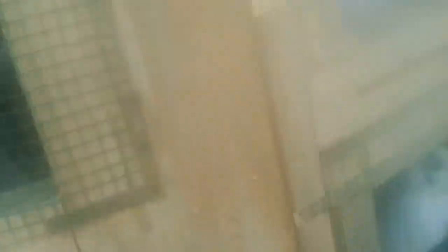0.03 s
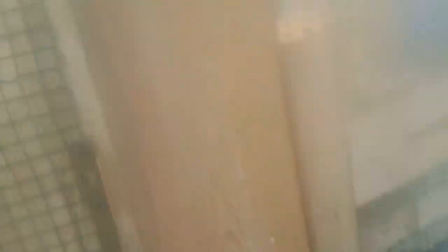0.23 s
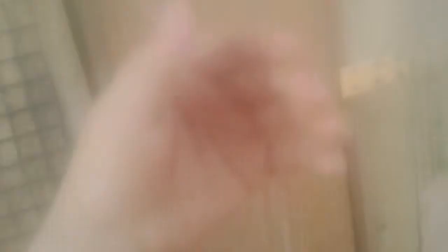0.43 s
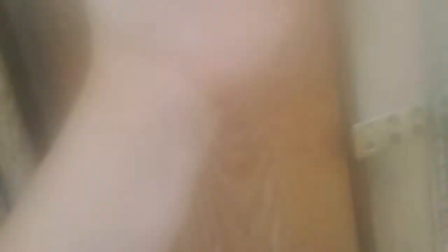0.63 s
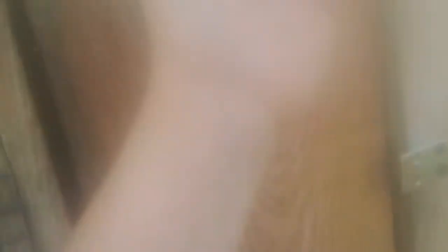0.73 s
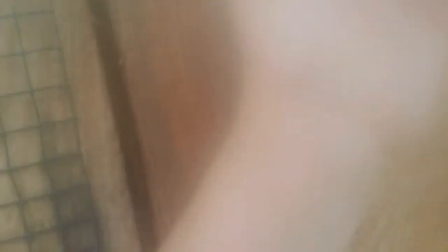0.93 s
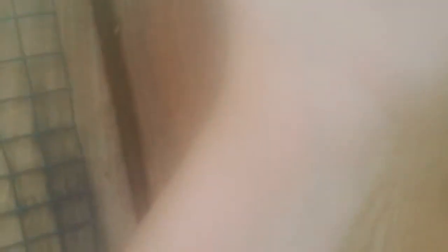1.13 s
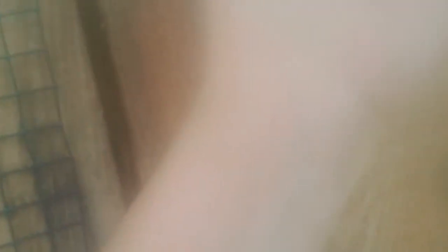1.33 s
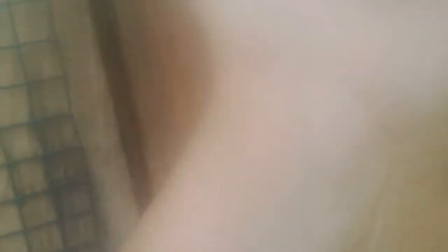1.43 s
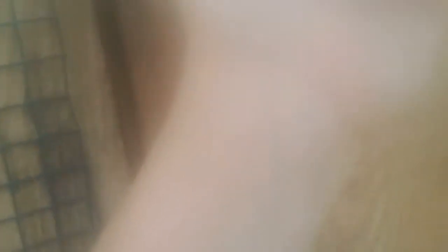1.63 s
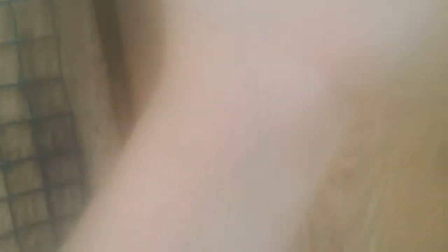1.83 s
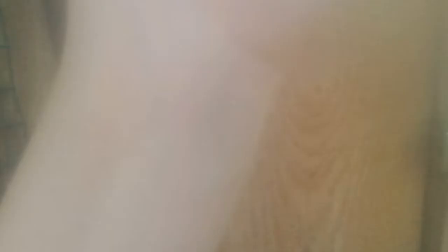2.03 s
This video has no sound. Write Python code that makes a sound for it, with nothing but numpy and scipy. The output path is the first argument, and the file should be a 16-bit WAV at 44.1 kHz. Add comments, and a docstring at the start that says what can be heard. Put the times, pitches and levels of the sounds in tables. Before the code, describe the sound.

Short, sharp clicks and light knocks from a hand working a wire hutch door's latch.

```python
"""The latch and wire door of a wooden hutch tick and knock on the frame as hands fumble with them.
Each knock sets wood and metal ringing, and close walls add a short echo. Skin and wire rub between
the knocks, the bumped hutch shudders once, and sliding metal squeaks twice. The handling rumbles
through the case of a small, close microphone that is most sensitive near 5 kHz."""
import sys
import numpy as np
from scipy import signal
from scipy.fft import rfft, irfft
from scipy.io import wavfile

SR = 44100
rng = np.random.default_rng(int(sys.argv[2]) if len(sys.argv) > 2 else 0)


def output_pcm(signal):
    """Save a mono or channel-first signal as 16-bit PCM at the path in sys.argv[1].

    Samples are clipped to [-1, 1] before scaling.
    """
    pcm = np.clip(np.atleast_2d(signal).T, -1, 1) * 32767
    wavfile.write(sys.argv[1], SR, np.round(pcm).astype(np.int16))


N = 92477   # about 2.1 s


def from_db(db):
    return 10 ** (np.asarray(db) / 20)


def unit_rms(x):
    """Scales a signal to an average power of 1."""
    return x / np.sqrt(np.mean(x ** 2) + 1e-20)


def level_curves(rows):
    """Joins a table's points with straight lines: one curve over time for each level column."""
    times, *columns = np.transpose(rows)
    return [np.interp(np.arange(N) / SR, times, column) for column in columns]


def coloured(x, spectrum):
    """Turns each frequency up or down as the table says; the result has power 1."""
    hz, db = np.transpose(spectrum)
    freqs = np.maximum(np.fft.rfftfreq(N, 1 / SR), 1)
    gain_db = np.interp(np.log(freqs), np.log(hz), db, left=-80, right=-80)
    return unit_rms(irfft(rfft(x) * from_db(gain_db), N))


def band_pass(x, band_hz):
    return signal.sosfilt(signal.butter(2, band_hz, "band", fs=SR, output="sos"), x)


def drift(rate_hz):
    """A smooth random wander, about 1 in size."""
    r = np.exp(-2 * np.pi * rate_hz / SR)
    return unit_rms(signal.lfilter([1], [1, -2 * r, r * r], rng.standard_normal(N + SR))[SR:])


def ring(x, hz, fade_s):
    """Each click in x starts a tone that falls by 60 dB in fade_s (its fade time)."""
    r, w = from_db(-60 / (fade_s * SR)), 2 * np.pi * hz / SR
    return signal.lfilter([0, np.sin(w)], [1, -2 * r * np.cos(w), r * r], x + 1e-18)


def grains(per_s, size, spread_db=1.5):
    """Tiny contacts: random clicks of uneven size and sign."""
    heights = from_db(spread_db * np.minimum(rng.exponential(1, size), 4))
    return heights * rng.choice([-1, 1], size) * (rng.random(size) < per_s / SR)


# Light rubbing that comes and goes (time [s], hiss level [dB], body level [dB])
RUB_LEVELS = [(0, -48, -56.5), (.05, -60, -66), (.1, -61, -64.5), (.18, -56.5, -60.5), (.28, -60.5, -61.5),
              (.33, -69, -69.5), (.42, -69, -70), (.52, -59, -60.5), (.6, -73.5, -70), (.7, -67, -73),
              (.8, -60.5, -60), (.9, -52, -62), (.96, -57, -60.5), (1.04, -54, -58), (1.1, -50, -40.5),
              (1.15, -54, -54.5), (1.2, -56, -60), (1.26, -54.5, -64.5), (1.38, -63.5, -65),
              (1.42, -59.5, -65), (1.49, -61, -64), (1.57, -65.5, -62.5), (1.62, -64, -59.5),
              (1.77, -64, -62), (1.81, -67, -76), (1.84, -54.5, -55.5), (1.9, -47, -38.5),
              (1.97, -52, -52.5), (2.01, -52, -58), (2.1, -46, -40.5)]
# Short, firmer scrapes (start [s], length [s], hiss level [dB], body level [dB])
SCRAPES = [(0, 0.0062, -71, -72), (0.202, 0.058, -58.5, -67), (0.434, 0.059, -44.5, -47.5),
           (0.852, 0.033, -48, -56.5), (1.27, 0.028, -62, -52.5), (1.328, 0.031, -54.5, -72),
           (1.658, 0.072, -47.5, -54.5), (1.861, 0.024, -43.5, -40.5), (2.05, 0.015, -38, -33)]
# Tone colour of the bright hiss and of the duller body (frequency [Hz], level [dB])
HISS_SPECTRUM = [(1470, -17), (2500, -23), (3390, -17.5), (3780, -11), (4780, 8), (5360, 8), (7390, -5.5),
                 (11800, -11.5), (14100, -11), (15500, -29)]
BODY_SPECTRUM = [(59, -27), (100, -12), (485, -9.5), (592, -4), (664, -7.5), (799, -7), (1090, -9),
                 (3000, -8), (3900, -3), (6600, -120)]


def rubbing(attack_s=0.0071, release_s=0.0069, flicker_db=1.5):
    """Skin slides on wire: thousands of tiny clicks blur into a bright hiss and a duller body."""
    hiss, body = map(from_db, level_curves(RUB_LEVELS))
    t = np.arange(N) / SR
    for start, length, hiss_db, body_db in SCRAPES:
        rise = np.clip((t - start) / attack_s, 0, 1)
        fall = np.exp(-np.maximum(t - start - length, 0) / release_s)
        hiss += from_db(hiss_db) * rise * fall
        body += from_db(body_db) * rise * fall
    grit = grains(per_s=9000, size=N)
    flicker = from_db(flicker_db * drift(rate_hz=72))
    return flicker * (hiss * coloured(grit, HISS_SPECTRUM) + body * coloured(grit, BODY_SPECTRUM))


# How loud the handling is (time [s], level [dB])
RUMBLE_LEVELS = [(0, -66), (.06, -76), (.2, -71), (.3, -73), (.42, -82), (.45, -65), (.52, -74),
                 (.7, -81.5), (.8, -61.5), (.84, -49), (.89, -58), (.925, -61), (.955, -64), (1.05, -65),
                 (1.1, -44), (1.2, -65.5), (1.38, -64), (1.45, -51.5), (1.58, -65.5), (1.68, -64.5),
                 (1.76, -53.5), (1.82, -66.5), (1.9, -53), (2.0, -58.5), (2.1, -48.5)]
# Its deep tone colour (frequency [Hz], level [dB])
RUMBLE_SPECTRUM = [(12, -49), (20, -22), (70, -10.5), (153, -4), (208, -14), (280, -8.5), (312, -9),
                   (500, -12), (650, -8), (1100, -120)]


def handling_rumble(wobble_db=0.77):
    """A hand on the microphone's case makes lumpy, low noise."""
    db, = level_curves(RUMBLE_LEVELS)
    loudness = from_db(db + wobble_db * drift(rate_hz=14))
    return loudness * coloured(rng.standard_normal(N), RUMBLE_SPECTRUM)


# Tone colour of the background (frequency [Hz], level [dB])
BACKGROUND_SPECTRUM = [(12, -31), (20, 3), (55, -19), (607, -16), (897, -8), (1660, -25), (1810, 2),
                       (2460, -15), (4940, -7), (6720, -8.5), (14300, -11), (16000, -35)]


def background_hiss(level_db=-73):
    """Faint, steady noise lies under everything."""
    return from_db(level_db) * coloured(rng.standard_normal(N), BACKGROUND_SPECTRUM)


# Knocks of the latch and door. Frame to crack are added to the level; chatter is relative to the click.
# (time [s], level [dB], frame [dB], box [dB], slat [dB], board [dB], crack [dB], chatter [dB],
# chatter fade time [s])
KNOCKS = [(0.0898, -48, 13.5, -25, -8, -29, -20, 4.9, 0.022),
          (0.1242, -43, -27, -18, -8.5, -10.5, -27, 3.5, 0.028),
          (0.166, -35.5, -51, -25, -1, -3, -29, 3.9, 0.011),
          (0.2547, -43, -33, -17, -27, -8.5, -14, 4.1, 0.017),
          (0.6389, -60.5, -21, -17, 6, -14, -18, 4.7, 0.0073),
          (0.6453, -55.5, -13, -5, -3, -2.5, -18, 5.6, 0.014),
          (0.8019, -43.5, -9, -2, -6.5, -5, -19, 3.3, 0.018),
          (0.8266, -24.5, -14, -20, -21, -15.5, -13.5, 6, 0.028),
          (0.8369, -30.5, -5.5, -30, -16, -8.5, -11, 5.8, 0.022),
          (0.863, -36.5, -4, -19, -22, -30, 2, 6, 0.029),
          (1.058, -24.5, -24, -29, -19.5, -16, -10, 4.7, 0.047),
          (1.0753, -3, -37, -26.5, -30.5, -14.5, -5, 6.1, 0.027),
          (1.3953, -25.5, -33, -19, -16.5, -8.5, -21, 6.7, 0.022),
          (1.4291, -23.5, -16.5, -9.5, -8.5, -8, -15, 4.6, 0.02),
          (1.5142, -37, -32, -24, -11.5, -2.5, -9, 4.6, 0.032),
          (1.5821, -20, -45, -37.5, -56, -56, -16.5, 6.7, 0.014),
          (1.6005, -41.5, -21, -33, -15, -7, -11, 6, 0.022),
          (1.6358, -21.5, -39, -40, -39, -48, -16.5, 8.2, 0.011),
          (1.6524, -28, -28, -49, -36, -43, -15, 5.4, 0.016),
          (1.6606, -23.5, -37, -43, -51, -43, -24, 7.4, 0.012),
          (1.6703, -19, -28.5, -51, -45, -43, -26, 6.3, 0.026),
          (1.6836, -24.5, -43, -31, -31, -39, -33, 6, 0.022),
          (1.696, -28, -16, -42, -39, -38, -32, 6.7, 0.024),
          (1.7034, -21, -27, -40, -29, -32, -27, 4.8, 0.026),
          (1.7103, -36.5, -36, -19, -23, -15, -9, 4.6, 0.017),
          (1.7405, -15, -32, -52, -14, -7.5, -7.5, 5.5, 0.019),
          (1.8644, -14.5, -33, -58, -20.5, -11.5, -22, 6.4, 0.018),
          (1.8727, -4.5, -40, -44, -22, -20, -38, 6.9, 0.013),
          (1.9058, -32, -15, -23, -16, -5, -11, 8.8, 0.029),
          (1.932, -9.5, -33, -43, -25, -14, -23, 6.5, 0.037),
          (1.9382, -13, -46, -25.5, -35, -18, -16, 5.7, 0.022),
          (1.9399, -15, -24.5, -22.5, -13.5, -5.5, -30, 4.5, 0.016),
          (2.0259, -22, -27, -35, -27, -17, -34, 5, 0.036),
          (2.0463, 3.5, -41, -42, -35, -22, -11.5, 6.6, 0.017),
          (2.0495, -19, -50, -33, -35, 0.5, -9, 4.4, 0.018),
          (2.0615, -19.5, -44, -21, -31, -28, -24, 8.1, 0.019)]
# Ringing tones of six parts, from low boom to sharp crack (frequency [Hz], level [dB], fade time [s])
FRAME_TONES = [(137, -9.5, 0.088), (211, -3.5, 0.045), (249, -2, 0.059), (311, -3, 0.042)]
BOX_TONES = [(418, -8, 0.036), (476, -1, 0.093), (534, -3.5, 0.039), (590, -3.5, 0.045)]
SLAT_TONES = [(763, -11, 0.048), (866, -2.5, 0.031), (1007, 6.5, 0.023), (1107, 0.5, 0.034)]
BOARD_TONES = [(1458, -4.5, 0.031), (1760, 2, 0.025), (2130, -1.5, 0.016), (2477, 0.5, 0.019),
               (2752, 0, 0.017)]
WIRE_TONES = [(3520, -26.5, 0.01), (3900, -13, 0.027), (4343, -8, 0.018), (4590, -1.5, 0.01),
              (4940, 0.5, .012), (5090, -6.5, 0.008), (5450, -2.5, 0.0091), (5610, -1, .012),
              (6110, -16, 0.0054)]
CRACK_TONES = [(7660, -2, 0.0036), (8960, -4, 0.002), (10760, -8, 0.0024), (12030, -5, 0.0017),
               (12800, -14, 0.0049)]
# The next five tables have one entry per part, in that order. How hard it is struck (level [dB])
PART_LEVELS = [-5.5, -10.5, -8, -9, -14.5, -4.5]
# How much of the chatter it takes (level [dB])
PART_CHATTER = [-7, -1, -3, -1.5, .5, -1]
# How long it chatters (multiple of the chatter fade time [no unit])
PART_LINGER = [1.56, 3.7, 1.9, 1.09, 1.29, 0.69]
# The range it sends into the air (lowest frequency [Hz], highest frequency [Hz])
PART_BANDS = [(100, 370), (330, 780), (620, 1330), (1200, 2830), (3100, 6600), (6800, 13100)]
# How late it sounds; the wood follows the wire (delay [s])
PART_DELAYS = [.0012, 0.00301, .0012, 0.001188, .0008, .0006]


def knocks(chatter_per_s=8000, spread_db=0.5):
    """Each knock is a click and a dying chatter of small contacts that set wood and wire ringing."""
    parts = [FRAME_TONES, BOX_TONES, SLAT_TONES, BOARD_TONES, WIRE_TONES, CRACK_TONES]
    length = SR // 10
    t = np.arange(length) / SR
    pushes = [np.zeros((len(tones), N + length)) for tones in parts]   # one row for each tone
    for time, db, frame, box, slat, board, crack, chatter_db, fade_s in KNOCKS:
        start = int(time * SR)
        part_db = db + np.add([frame, box, slat, board, 0, crack], PART_LEVELS)   # the wire is the 0
        for i, tones in enumerate(parts):
            fade = from_db(-60 * t / (fade_s * PART_LINGER[i]))
            chatter = unit_rms(fade * grains(chatter_per_s, length)) / np.sqrt(length)
            blow = from_db(chatter_db + PART_CHATTER[i]) * chatter
            blow[0] = 1   # the first click
            strengths = from_db(part_db[i] + spread_db * rng.standard_normal(len(tones)))
            pushes[i][:, start:start + length] += np.outer(strengths, blow)
    out = np.zeros(N + length)
    for tones, rows, band_hz, delay_s in zip(parts, pushes, PART_BANDS, PART_DELAYS):
        rings = [from_db(db) * ring(push[:N], hz, fade_s) for push, (hz, db, fade_s) in zip(rows, tones)]
        lag = int(delay_s * SR)
        out[lag:lag + N] += band_pass(sum(rings), band_hz)
    return out[:N]


def wall_echo(x, level_db=-15.5, fade_s=0.11, delay_s=0.0064, cutoff_hz=5800):
    """Close walls throw the sound back as a short, dull, dense tail."""
    t = np.arange(SR // 2) / SR
    tail = rng.standard_normal(len(t)) * from_db(-60 * t / fade_s) * (t > delay_s)
    tail = signal.sosfilt(signal.butter(1, cutoff_hz, fs=SR, output="sos"), tail)
    tail /= np.sqrt(np.sum(tail ** 2))
    return from_db(level_db) * signal.fftconvolve(x, tail)[:N]


# How strongly the hutch shakes (time [s], level [dB])
SHUDDER_LEVELS = [(.8, -90), (.83, -57), (.87, -55.5), (.9, -59), (.925, -53), (.96, -68), (1.0, -90)]


def hutch_shudder():
    """The hutch gives a short, deep wobble after its door is bumped."""
    db, = level_curves(SHUDDER_LEVELS)
    return from_db(db) * unit_rms(band_pass(rng.standard_normal(N), band_hz=(48, 133)))


# Metal squeaks (start [s], length [s], level [dB], pitch [Hz], final drop in pitch [Hz])
SQUEAKS = [(1.045, 0.033, -48, 9060, 50), (1.908, .026, -29.5, 9330, 500)]


def squeaks(waver_hz=40):
    """Metal slides on metal with a thin tone that swells, then sags in pitch as it ends."""
    out, t = np.zeros(N), np.arange(N) / SR
    for start, length, db, hz, drop_hz in SQUEAKS:
        progress = np.clip((t - start) / length, 0, 1)
        pitch = hz - drop_hz * progress ** 5.1 + waver_hz * drift(rate_hz=340)
        swell = np.sin(np.pi * progress ** 1.84)
        out += from_db(db) * swell * np.sin(2 * np.pi * np.cumsum(pitch) / SR)
    return out


def scene():
    """Adds all the sounds into one channel; only the knocks get an echo."""
    hutch = knocks()
    noises = rubbing() + handling_rumble() + background_hiss()
    return (noises + hutch + wall_echo(hutch) + hutch_shudder() + squeaks())[None]


def record(dry, peak_limit=0.72, treble_hz=15000, treble_db=-15, cutoff_hz=16450):
    """The microphone rounds off the loudest peaks, turns down the top treble and cuts what lies above."""
    rounded = dry / (1 + np.abs(dry / peak_limit) ** 4) ** .25
    below = signal.sosfiltfilt(signal.butter(10, treble_hz, fs=SR, output="sos"), rounded)
    softened = below + from_db(treble_db) * (rounded - below)
    return signal.sosfilt(signal.cheby2(12, 70, cutoff_hz, fs=SR, output="sos"), softened)


dry = scene()
out = record(dry)
output_pcm(out)
```